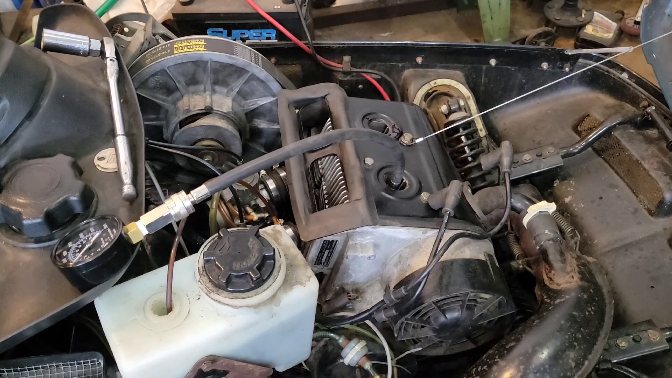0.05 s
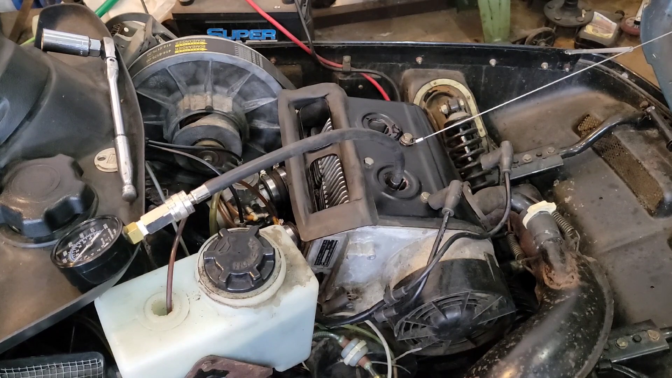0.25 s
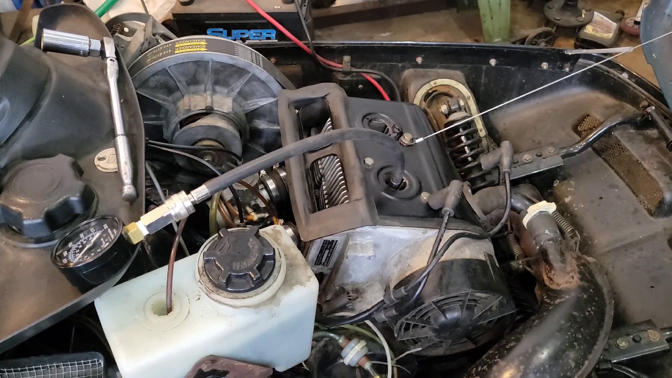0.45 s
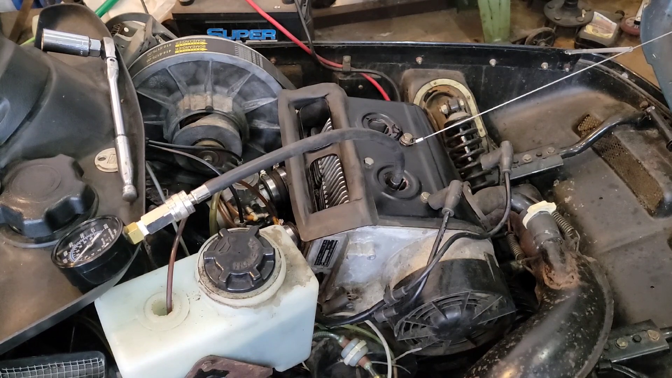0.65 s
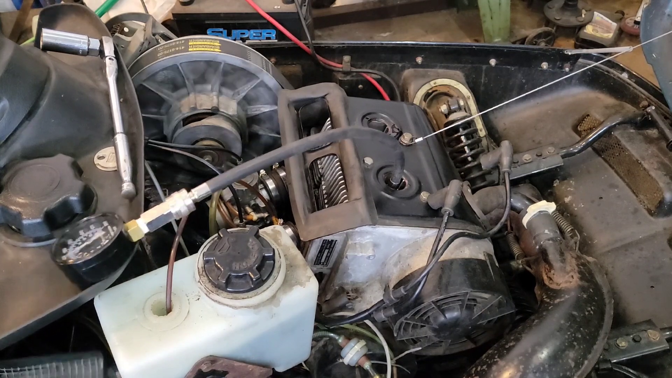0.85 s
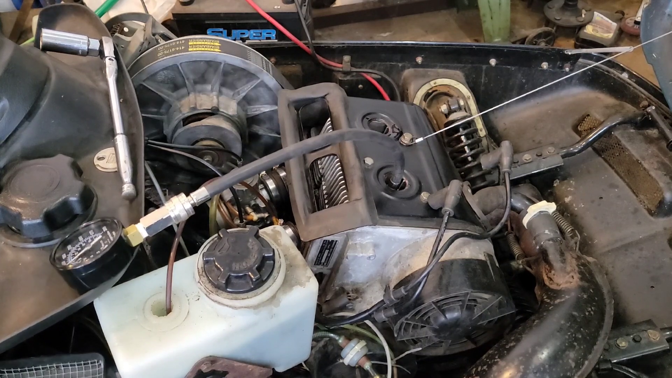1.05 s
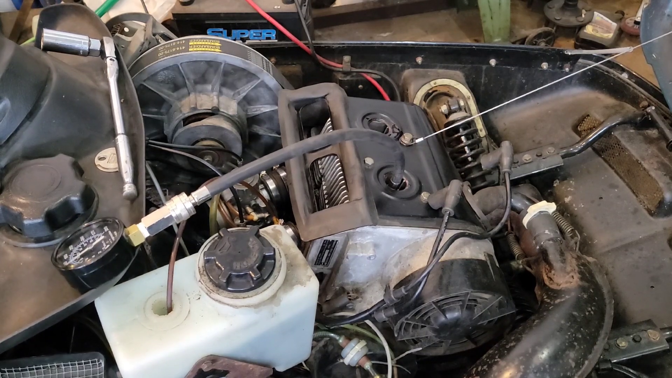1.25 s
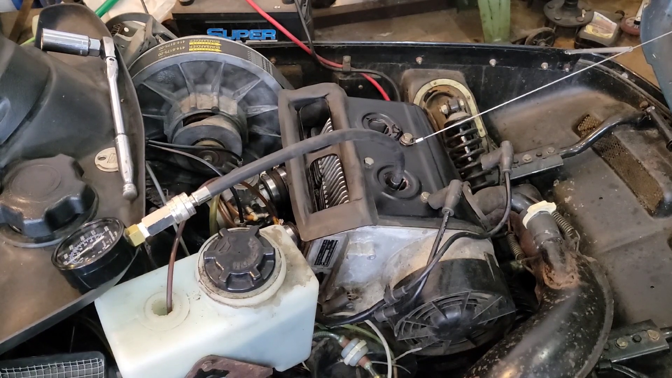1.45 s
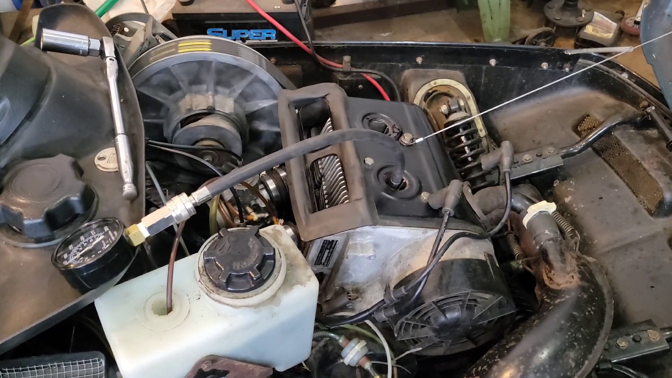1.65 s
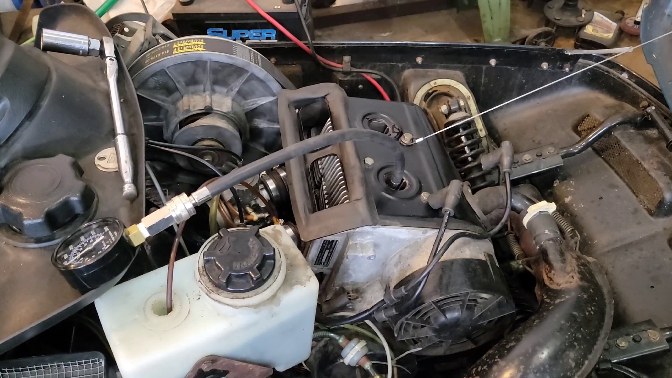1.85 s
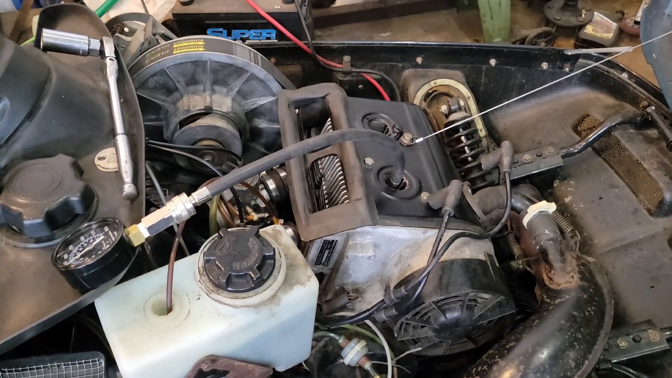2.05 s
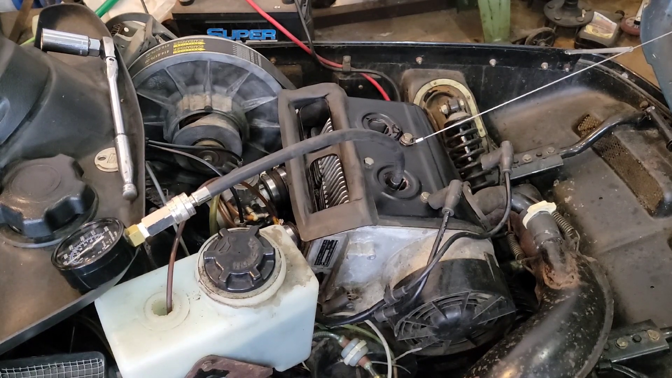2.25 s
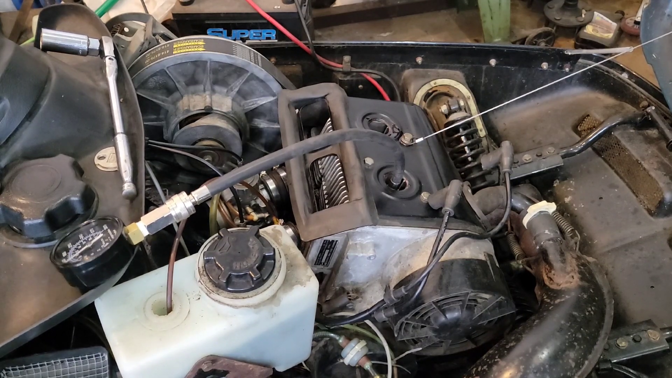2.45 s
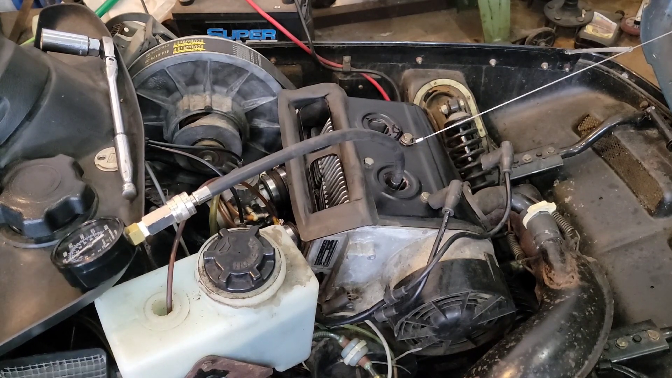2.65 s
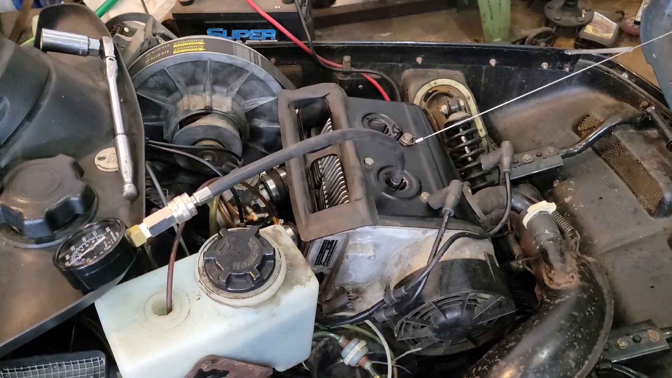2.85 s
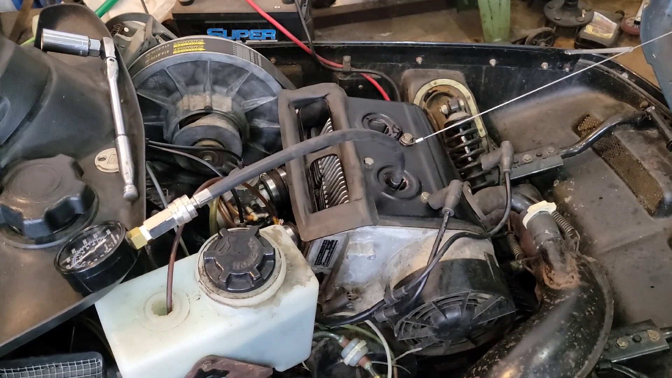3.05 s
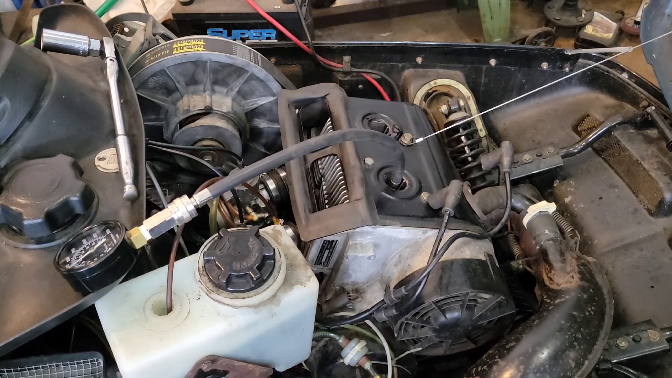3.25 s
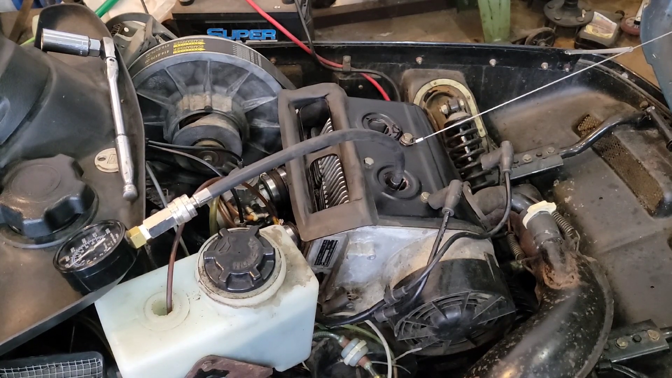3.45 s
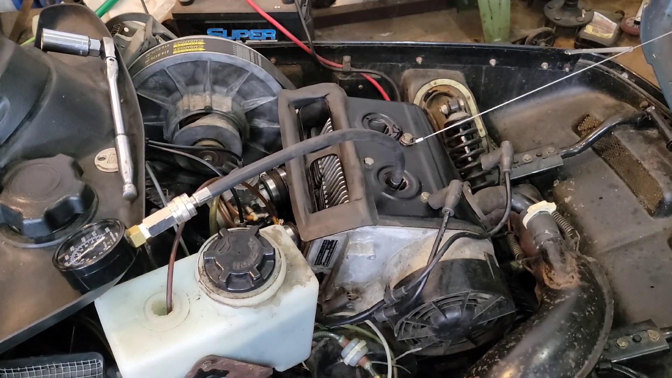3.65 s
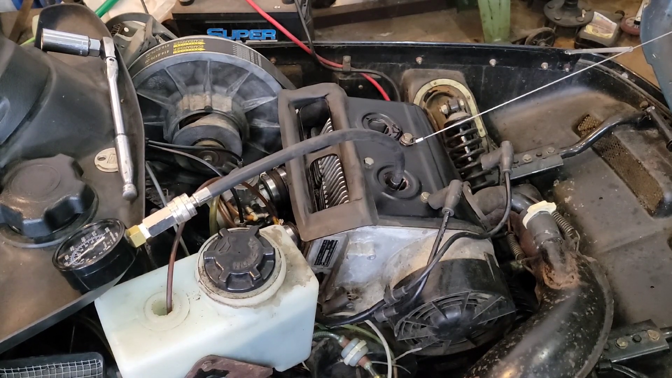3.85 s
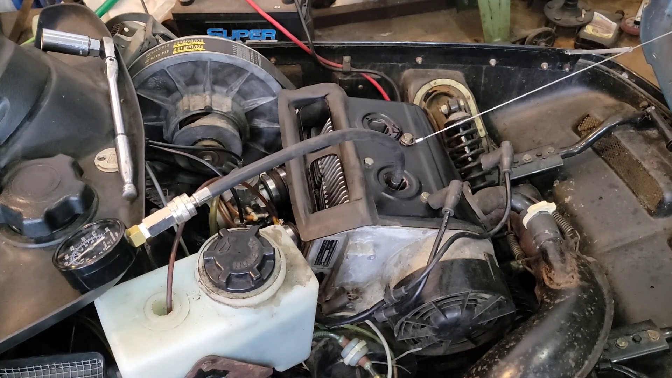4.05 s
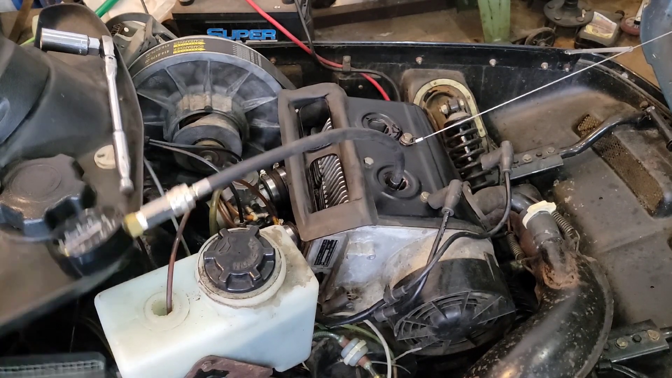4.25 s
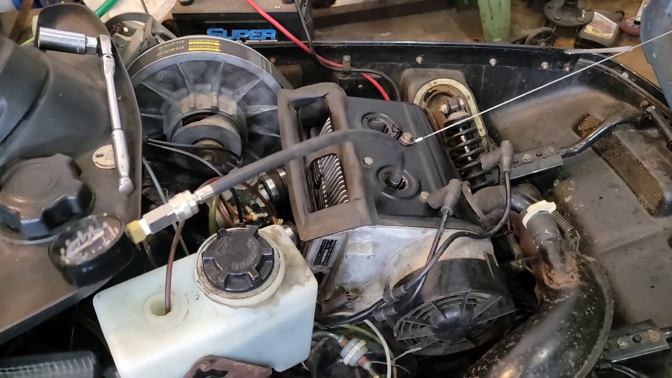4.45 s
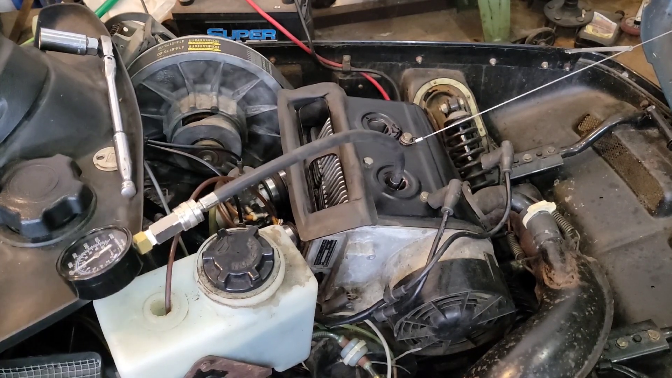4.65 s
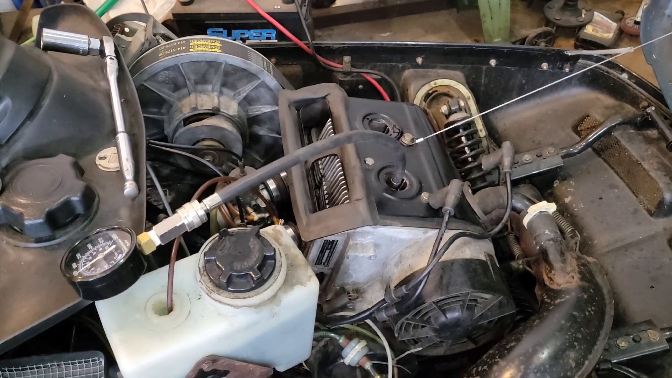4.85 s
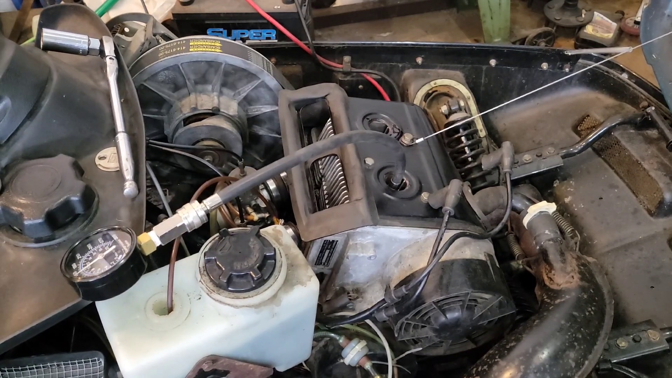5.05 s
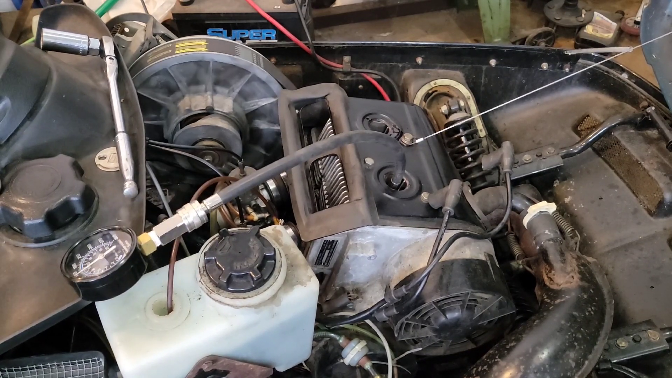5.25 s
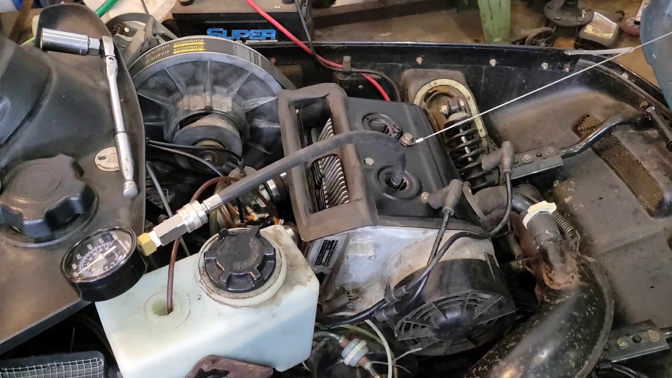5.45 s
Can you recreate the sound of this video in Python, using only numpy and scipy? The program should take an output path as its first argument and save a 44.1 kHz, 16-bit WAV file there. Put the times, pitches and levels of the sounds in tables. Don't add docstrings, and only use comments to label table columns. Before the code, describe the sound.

Two hard rope-start pulls spin a small engine in short puffing, clattering bursts that die without catching, separated by quiet rewinding scrapes and knocks.

```python
import sys
import numpy as np
from scipy import signal
from scipy.fft import rfft, irfft
from scipy.io import wavfile

SR = 44100
rng = np.random.default_rng(int(sys.argv[2]) if len(sys.argv) > 2 else 0)


def gain_from_db(level_db):
    decades = np.asarray(level_db, float) / 20
    return 10 ** decades


def digitize_waveform(pressure):
    field = np.atleast_2d(pressure).T
    bounded = np.clip(field, -1, 1)
    quanta = np.round(bounded * 32767).astype(np.int16)
    wavfile.write(sys.argv[1], SR, quanta)


N = 242991
EARS = np.array([[1], [-1]])


def rms_one(x):
    return x / np.sqrt(np.mean(x ** 2) + 1e-20)


def in_time(rows):
    s, *columns = np.transpose(rows)
    return [np.interp(np.arange(N) / SR, s, column) for column in columns]


def at_hz(points, hz):
    points_hz, values = np.array(points).T
    return np.interp(np.log(hz), np.log(points_hz), values)


def add(track, start_s, piece):
    i = round(start_s * SR)
    end = min(N, i + piece.shape[-1])
    track[..., i:end] += piece[..., :end - i]


def drift(rate_hz):
    r = np.exp(-80 * np.pi * rate_hz / SR)
    slow = signal.lfilter([1], [1, -2 * r, r * r], rng.standard_normal(N // 40 + 2002))[2000:]
    return np.interp(np.arange(N) / 40, np.arange(len(slow)), rms_one(slow))


def wobble(t, rough_db):
    steps_s = np.arange(0, t[-1] + .012, .012)
    flutter = np.array([np.interp(t, steps_s, rng.standard_normal(len(steps_s))) for ear in (0, 1)])
    return gain_from_db(rough_db * np.minimum(t / 0.095, 1) * flutter)


def resonate(x, hz, width_hz):
    r = np.exp(-np.pi * width_hz / SR)
    poles = [1, -2 * r * np.cos(2 * np.pi * hz / SR), r * r]
    return signal.lfilter([(1 - r * r) / 2, 0, (r * r - 1) / 2], poles, x)


def highpass(x, order, cut_hz):
    return signal.sosfilt(signal.butter(order, cut_hz, "high", fs=SR, output="sos"), x)


# (time [s], thump level [dB], thump pitch [Hz], bark level [dB])
EXHAUST_OPENINGS = [(0.9187, -7.5, 102.6, -4.5), (1.044, -5, 116.4, -5), (1.1455, -4, 105, -5),
                    (1.256, -8, 119, -6.5), (1.3923, -6.5, 101, -8), (1.599, -15, 80.6, -15.5),
                    (1.75, -21, 98.6, -56), (4.467, -7.5, 96.6, -4.5), (4.589, -6, 121, -3.5),
                    (4.691, -2.5, 109, -9), (4.803, -13, 101, -20), (4.944, -12, 102, -8),
                    (5.04, -15, 81.5, -11.5), (5.303, -26.5, 90, -22)]
BARK_HZ, BARK_HZ_PER_DB = 473, 6.5


def exhaust_pops():
    out, t = np.zeros(N), np.arange(-.03, .12, 1 / SR)
    for s, thump_db, thump_hz, bark_db in EXHAUST_OPENINGS:
        bark_hz = BARK_HZ + BARK_HZ_PER_DB * thump_db
        thump_shape = np.where(t < 0, np.exp(-(t / 0.0061) ** 2), np.exp(-t / 0.017))
        bark_shape = np.where(t < 0, np.exp(-(t / 0.0016) ** 2), np.exp(-t / 0.0036))
        thump = gain_from_db(thump_db) * thump_shape * np.cos(2 * np.pi * thump_hz * t)
        bark = gain_from_db(bark_db) * bark_shape * np.cos(2 * np.pi * bark_hz * t)
        add(out, s + t[0], -thump - bark)
    return out


# (first crest time [s], level [dB], start pitch [Hz], open time [s])
INTAKE_OPENINGS = [(.986, -7.5, 123, 0.033), (1.079, -12.5, 91, 0.02), (1.109, -11.5, 98, 0.022),
                   (1.197, -10.5, 123, 0.043), (1.314, -11, 112.4, 0.038), (1.482, -15, 92.5, 0.038),
                   (1.787, -24, 100, 0.012), (4.5313, -7.5, 109, 0.03), (4.628, -11.5, 95, 0.012),
                   (4.656, -9.5, 92.5, 0.036), (4.693, -21, 114, 0.058), (4.742, -12, 113, 0.032),
                   (4.7983, -6.5, 100, 0.003), (4.865, -21.5, 103, 0.044), (5.0715, -21, 102, 0.025)]
CRANKCASE_REST_HZ = 80.6


def intake_gulps():
    out, t = np.zeros(N), np.arange(-.02, .12, 1 / SR)
    for s, level_db, start_hz, open_s in INTAKE_OPENINGS:
        slide = (CRANKCASE_REST_HZ - start_hz) * t * np.abs(t) / (2 * open_s)
        phase = 2 * np.pi * (start_hz * t + slide)
        swell = (np.minimum(t, 0) / 0.0051) ** 2
        closing = (np.maximum(t - open_s, 0) / 0.0053) ** 2
        ring = np.cos(phase) + .2 * np.cos(2 * phase + 0.21)
        add(out, s + t[0], gain_from_db(level_db) * np.exp(-swell - closing) * ring)
    return out


def port_slaps(level_db, t60_s):
    out, t = np.zeros(N), np.arange(0, .1, 1 / SR)
    for s, port_db, *_ in INTAKE_OPENINGS + EXHAUST_OPENINGS:
        slap = gain_from_db(port_db + level_db - 60 * t / t60_s) * (1 - np.exp(-t / 0.027))
        add(out, s - .012, slap)
    return out


# (time [s], chassis shake [dB], pulley and fan effort [dB])
PULLS = [
    [(.76, -53, -48.5), (.83, -51, -39), (.95, -24.5, -23.5), (1.03, -19, -23.5), (1.27, -22, -27),
     (1.55, -33.5, -33.5), (1.7, -42, -39), (1.87, -47, -47.5), (2.16, -90, -86)],
    [(4.34, -57, -46.5), (4.5, -25.5, -28), (4.58, -19, -23), (4.74, -25, -29), (5.03, -18, -28),
     (5.14, -25, -32), (5.25, -36.5, -36.5), (5.39, -43, -40), (5.51, -66, -46.5)],
]
# (time [s], level [dB])
ROPE_SLIDE = [(0, -58), (.7, -62), (1.3, -32), (1.55, -35.5), (1.84, -33.5), (2.12, -40.5), (2.33, -41),
              (2.55, -51.5), (2.68, -35), (2.87, -48), (3.08, -43), (3.22, -52.5), (3.64, -50.5),
              (3.99, -69), (4.4, -65.5), (5.28, -44), (5.38, -34.5), (5.51, -43)]
PULL_DB = [1.5, -1.5, -3.5, 2.5, -9.5, -18]
ROPE_DB = [-16, -16.5, -7, -10.5, -10.5, -30]
PULL_FOLLOWS = [0.95, 0.9, 0.99, 1.026, 1.13, 0.94]
ROPE_FOLLOWS = [0.68, 0.81, 1.21, 0.48, 0.36, 0.27]
FULL_DB, SLIDING_DB, BOOM_TOP_DB = -25, -55, -29


def rattle_levels():
    drives = []
    for rows in PULLS:
        before, after = (rows[0][0] - .01, -120, -120), (rows[-1][0] + .1, -120, -120)
        drives.append(in_time([before] + rows + [after]))
    shake_db, effort_db = np.max(drives, axis=0)
    rope_db, = in_time(ROPE_SLIDE)
    pulled_db, slid_db = [], []
    for drive_db, db, steep in zip([shake_db] * 2 + [effort_db] * 4, PULL_DB, PULL_FOLLOWS):
        pulled_db.append(FULL_DB + db + steep * (drive_db - FULL_DB))
    for db, steep in zip(ROPE_DB, ROPE_FOLLOWS):
        slid_db.append(SLIDING_DB + db + steep * (rope_db - SLIDING_DB))
    pulled_db[0] = np.minimum(pulled_db[0], BOOM_TOP_DB)
    return gain_from_db(np.array(pulled_db)) + gain_from_db(np.array(slid_db))


# (frequency [Hz], correlation [-1..1])
LIKENESS = [(60, 1), (130, 0.93), (290, 0.83), (640, 0.041), (1410, -0.34), (3100, -0.051), (6820, -0.14),
            (15000, -0.05)]
# (frequency [Hz], source number [-])
ZONES = [(140, 0), (210, 1), (420, 1), (520, 2), (940, 2), (1080, 3), (1900, 3), (3400, 4), (6600, 4),
         (7400, 5)]


def stereo_zones(spectrum, patchy_db, grit_db):
    edges_hz = 30 * 2 ** (np.arange(28) / 3)
    contact = gain_from_db(grit_db * drift(110))
    white = rng.standard_normal((2, 2, N)) * contact
    zones = np.zeros((6, 2, N))
    for k, (low_hz, high_hz) in enumerate(zip(edges_hz, edges_hz[1:])):
        band_filter = signal.butter(2, [low_hz, high_hz], "band", fs=SR, output="sos")
        mid, side = signal.sosfilt(band_filter, white[k % 2])
        hz = np.sqrt(low_hz * high_hz)
        alike = np.clip(at_hz(LIKENESS, hz), -1, 1)
        gain = gain_from_db(at_hz(spectrum, hz) + patchy_db * drift(14.5))
        band = gain * (np.sqrt(1 + alike) * mid + np.sqrt(1 - alike) * side * EARS)
        place = at_hz(ZONES, hz)
        zones[int(place)] += (1 - place % 1) * band
        zones[int(np.ceil(place))] += place % 1 * band
    return zones


# (frequency [Hz], width [Hz], level [dB])
HOUSING = [(190, 25, -7), (318, 20, -3), (397, 16, -4), (530, 35, -5), (732, 30, 0), (850, 45, -4),
           (634, 40, -3), (993, 35, -7), (1267, 35, -5), (2060, 50, -9), (2980, 90, -10)]


def housing(x):
    out = .5 * x
    for hz, width_hz, level_db in HOUSING:
        out = out + gain_from_db(level_db + 3.4 * drift(14.0)) * resonate(x, hz, width_hz)
    return rms_one(out)


# (frequency [Hz], density [dB per Hz])
COLOUR = [(18, -45), (50, -4), (106, -5.5), (233, -12), (384, -11.5), (666, -23), (721, -17), (1350, -20.5),
          (1860, -19.5), (2170, -24), (3060, -21), (6050, -27.5), (8520, -45), (13700, -48.5), (16000, -53)]


def clatter(low_hz, high_hz, per_s, spread_db, t60_s):
    sizes = gain_from_db(spread_db * np.minimum(rng.exponential(1, (2, N)), 2))
    clicks = sizes * (rng.random((2, N)) < per_s / SR)
    dealt, out = rng.integers(0, 10, (2, N)), 0
    r = gain_from_db(-60 / (t60_s * SR))
    for k, hz in enumerate(np.geomspace(low_hz, high_hz, 10) * rng.uniform(0.94, 1.04, 10)):
        w = 2 * np.pi * hz / SR
        struck = clicks * (dealt == k) + 1e-18
        rung = signal.lfilter([0, np.sin(w)], [1, -2 * r * np.cos(w), r * r], struck)
        out = out + gain_from_db(at_hz(COLOUR, hz)) * np.sqrt(hz) * rung
    return rms_one(out)


TICKS = [(.7726, -18.5, -1.5, -12.5, 0.059), (.8994, -17.5, 5, 6.5, 0.14), (1.1109, -30.5, -21, 4.5, 0.04),
         (1.4879, -31.5, 6, 12, 0.025), (1.6174, -43, 12, 11.5, 0.16), (1.8585, -49.5, -5, 7.5, 0.28),
         (2.0364, -30.5, -8, 9, 0.036), (5.099, -38, -20, 9.5, 0.03), (5.238, -40, -20, 14, 0.03),
         (5.253, -38.5, -20, 10, 0.065), (2.232, -45.5, -20, 8, 0.059), (2.5557, -47, -10, 6, 0.03),
         (2.6145, -51, -10, 4, 0.03), (2.7625, -47, -10, 8, 0.033), (2.8789, -44, -9.5, 7, 0.041),
         (4.359, -41.5, -8, 6, 0.04), (2.8474, -45, -18, 11, 0.024), (4.436, -23.5, -4, 10, 0.18),
         (4.448, -23.5, 1, 5.5, 0.14), (4.8019, -25, -39, 18.5, 0.086), (4.8478, -10, 0.5, -1.8, 0.33),
         (5.0412, -17.5, -1, 0, 0.071), (5.14, -8, -4.5, -9.5, 0.1)]
KNOCKS = [(4.0834, -69.5, 17.5, -16.5, 0.094), (.838, -21, 6.5, 1.5, 0.3), (1.049, -16.5, 15, -30.5, 0.067),
          (2.118, -51.5, 2, 10, 0.18), (2.566, -36.5, 1, 8, 0.12), (2.577, -38, 1, 2, 0.13),
          (2.7444, -34.5, -5, -2.5, 0.2), (2.7904, -42, -4, 14, 0.064), (3.3254, -74, 12, -13, 0.19),
          (4.3066, -37, 5, 2.5, 0.3), (4.3705, -24, 0.5, -7.5, 0.61), (4.396, -22.5, 5, -4, 0.5),
          (4.516, -20.5, 11.5, -13, 0.12)]
THUDS = [(.0235, -44.5, -2, -14, 0.081), (.056, -49, 6.5, 0, 0.16), (.2467, -49, -14, -12, 0.34),
         (1.3188, -9, -17, -5, 0.049), (1.345, -18.5, -29, 5.5, 0.11), (1.716, -25.5, -14, -7.5, 0.23),
         (2.4923, -38.5, -18, 13.5, 0.022), (2.4945, -29.5, 6, -2.5, 0.44), (2.6798, -23.5, 3, -9.5, 0.15),
         (2.9445, -24.5, -2.5, -16, 0.12), (3.1574, -57, -34, -10, 0.061),
         (3.4657, -41.5, -11.5, -12, 0.13), (3.5693, -46, -25, -6, 0.13), (3.6197, -35, -10.5, -8, 0.14),
         (4.7744, -37, -21, 18.5, 0.1), (5.2516, -27, -20, 5.5, 0.15)]
SCUFFS = [(.678, -55.5, 10, 7, 0.19), (2.020, -26, -10, 3, .15), (2.227, -21.5, -2, 3, 0.06),
          (2.873, -37, -25, 4.5, 0.2), (4.278, -41, 9.5, -5, 0.31), (4.708, -4, -3, -1, 0.029),
          (.764, -32.5, 3, 12, 0.1)]
TICK_HISS_DB, KNOCK_HISS_DB, THUD_HISS_DB = -1, -14.5, -17.5
SCUFF_RISE_S = .007


def knock_envelopes():
    out, t = np.zeros((4, 2, N)), np.arange(0, .5, 1 / SR)
    kinds = [(TICKS, TICK_HISS_DB, 0), (KNOCKS, KNOCK_HISS_DB, 0), (THUDS, THUD_HISS_DB, 0),
             (SCUFFS, KNOCK_HISS_DB, SCUFF_RISE_S)]
    part_lasts = np.array([1.13, 1.02, 0.65, 0.61])[:, None, None]
    part_snap = np.array([0.049, 0.28, 0.91, 0.15])[:, None, None]
    snap = part_snap * np.exp(-t / 0.0027)
    for rows, hiss_db, rise_s in kinds:
        for s, peak_db, dull_db, bright_db, t60_s in rows:
            parts_db = np.array([dull_db, 0, bright_db, bright_db + hiss_db])
            levels = gain_from_db(peak_db - 10.5 + parts_db)[:, None, None]
            lasts_s = max(t60_s, .01) * part_lasts
            crack_and_tail = gain_from_db(-60 * t / lasts_s) + 0.41 * gain_from_db(-60 * t / (5.13 * lasts_s))
            sides = gain_from_db(EARS * rng.normal(0, 1.2))
            rise = 1 - np.exp(-t / (0.0068 * t60_s + rise_s))
            if rise_s:
                rise = rise ** 2
            add(out, s, levels * sides * (crack_and_tail + snap) * rise)
    return out


def rattle():
    boom, panel, cowl, scrape, jingle, hiss = stereo_zones(COLOUR, patchy_db=2.0, grit_db=1.0)
    scrape = housing(scrape) + .55 * clatter(1100, 2500, per_s=250, spread_db=4.0, t60_s=.04)
    jingle = housing(jingle) + .6 * clatter(2500, 6800, per_s=900, spread_db=4.0, t60_s=.045)
    noises = [rms_one(boom), housing(panel), housing(cowl), rms_one(scrape), rms_one(jingle), rms_one(hiss)]
    dull, middle, bright, top = knock_envelopes()
    panel_knocks = 0.34 * dull + port_slaps(level_db=-7.5, t60_s=0.073)
    knocks = [.07 * dull, panel_knocks, dull, middle, bright, top]
    return sum(noise * (level + knock) for noise, level, knock in zip(noises, rattle_levels(), knocks))


# (time [s], level [dB])
BRACKET_BLOWS = [(1.321, -21), (1.345, -22.5), (1.376, -29)]
PAWL_BLOWS = [(4.775, -27.5), (4.802, -19.5)]
GUIDE_BLOWS = [(2.033, -34), (2.039, -21), (2.240, -37)]
# (frequency [Hz], level [dB], t60 [s])
BRACKET_MODES = [(1690, -4, .15), (2000, 0.5, .08), (2150, -4.5, .08), (2540, -3.5, 0.2), (2740, 3, .07),
                 (3020, 1.5, .08), (3280, -1, 0.03), (3380, -10.5, 0.14), (4486, -9.5, .25),
                 (4600, -9.5, .2), (5700, -9.5, 0.18)]
PAWL_MODES = [(1812, 6, .25), (1935, 6, .22), (2070, -4, .15), (2350, -3, .25), (3700, -1, .17),
              (4755, 0, .09), (6100, -14, .06), (4540, -12, .05), (6912, -12, .2)]
GUIDE_MODES = [(839, -6.5, 0.14), (1446, -9, 0.043), (1840, -8, 0.08), (2900, 5.5, 0.036),
               (3030, -16, 0.25), (3100, -16, 0.27), (3140, -4, 0.042), (4040, -10, 0.025),
               (4620, -19, .05)]
RISE_CYCLES = 6.0


def struck_metal():
    out, t = np.zeros((2, N)), np.arange(0, .6, 1 / SR)
    parts = [(BRACKET_BLOWS, BRACKET_MODES), (PAWL_BLOWS, PAWL_MODES), (GUIDE_BLOWS, GUIDE_MODES)]
    strikes = [(blow, mode) for blows, modes in parts for blow in blows for mode in modes]
    for (s, blow_db), (hz, level_db, t60_s) in strikes:
        start = rng.uniform(0, 2 * np.pi) + rng.uniform(0.3, 0.52) * EARS
        first = 1 + hz / 4000 * np.exp(-t / 0.004)
        rise = 1 - np.exp(-t * hz / RISE_CYCLES)
        fade = gain_from_db(blow_db + level_db - 60 * t / t60_s) * first * rise
        add(out, s, fade * wobble(t, rough_db=3.0) * np.sin(2 * np.pi * hz * t + start))
    return out


PINGS = [(0.028, 356, -50.5, 0.62), (3.622, 4580, -43, 0.063), (3.621, 1260, -47, 0.074),
         (3.621, 822, -44, 0.094), (3.622, 608, -48.5, 0.29), (.248, 1230, -50, .1),
         (.520, 531, -53.5, 0.16), (.778, 840, -25, 0.11), (0.899, 3720, -16, 0.06),
         (0.978, 2680, -19.5, 0.09), (1.05, 732, -8.5, 0.13), (.056, 2850, -56, .08),
         (.066, 3050, -56, .05), (.066, 700, -49, .12), (.682, 2950, -60, .05), (.248, 2900, -59, .04),
         (3.466, 2500, -54, .04), (3.57, 1300, -56, .05), (2.682, 748, -25, 0.24),
         (2.848, 13000, -44, 0.046), (2.946, 623, -33, 0.091), (2.97, 107, -49, 0.47),
         (3.464, 2860, -52, .08), (3.623, 2170, -38, 0.04), (3.624, 353.6, -48, 0.35),
         (4.087, 270, -57.5, 0.08), (3.326, 647, -46.5, 0.065), (0.901, 5800, -27, 0.3),
         (2.4925, 3900, -27, 0.035), (2.4925, 5300, -29, 0.02), (2.497, 820, -27, 0.12),
                (2.565, 4400, -35, 0.04), (2.581, 3860, -31, 0.06), (2.764, 830, -30, 0.05),
                (2.803, 800, -32, 0.2),
         (4.311, 513, -34.5, 0.093), (4.332, 95, -36, 0.11), (4.449, 3780, -41, 0.28),
              (4.516, 696, -10.5, 0.065), (4.856, 292, -7.5, 0.045), (4.893, 424, -9.5, 0.089),
              (4.924, 310, -9, 0.056), (4.714, 3620, -17, 0.047), (5.045, 1750, -19, 0.039),
              (5.145, 6450, -19, 0.021)]
# (time [s], pitch [Hz], level [dB], t60 [s])
MORE_PINGS = [(.85, 928, -19.5, 0.11), (.94, 840, -26.5, 0.064), (0.972, 1100, -19, .07),
              (1.005, 1490, -25.5, 0.087), (1.035, 560, -16.5, .06), (1.062, 924, -18, .06),
              (1.09, 628, -24, 0.058), (1.108, 2110, -19, .05), (1.122, 800, -25.5, 0.064),
              (1.149, 1157, -17, .06), (1.27, 780, -28.5, .07), (1.322, 5700, -24, .08),
              (1.321, 3020, -18.5, .08), (1.322, 2000, -23.5, .07), (1.332, 1414, -22, .07),
              (1.346, 3060, -15, .07), (1.347, 4530, -29.5, .15), (1.392, 1160, -20, 0.052),
              (1.482, 736, -23, 0.1), (1.602, 1030, -24, 0.11), (1.632, 752, -25, 0.058),
              (1.721, 1002, -26, 0.1), (1.752, 875, -32, 0.1),
              (4.371, 744, -22, 0.12), (4.405, 720, -20.5, 0.14), (4.42, 1456, -19.5, 0.12),
                   (4.435, 820, -16.5, 0.065), (4.445, 2060, -19, 0.053), (4.455, 1077, -15.5, 0.13),
                   (4.512, 2380, -32, 0.046), (4.55, 520, -29, 0.062), (4.552, 730, -26, 0.063),
                   (4.565, 1640, -16, 0.066), (4.61, 1240, -18.5, 0.089), (4.635, 316, -19, 0.17),
                   (4.523, 322, -14, .05), (4.795, 424, -12.5, 0.055), (4.655, 2650, -21, 0.064),
                   (4.712, 1278, -20, 0.2), (4.732, 710, -17, 0.065), (4.853, 790, -14, .05),
                   (4.866, 520, -13, 0.062), (4.905, 630, -14.5, 0.066), (4.975, 343, -17, .1),
                   (5.03, 186, -15, 0.085), (5.06, 403, -15, 0.053), (5.14, 2425, -22, 0.072),
                   (5.141, 1890, -17, 0.066), (5.148, 903, -17, 0.067), (5.155, 369, -18, 0.14),
                   (5.18, 1008, -20.5, 0.13)]


def pings():
    out, t = np.zeros((2, N)), np.arange(0, .5, 1 / SR)
    for s, hz, level_db, t60_s in PINGS + MORE_PINGS:
        start = rng.uniform(.4, 1, (2, 1, 1)) * EARS * min(hz / 1200, .9)
        main = np.sin(2 * np.pi * hz * t + start[0])
        partner = .5 * np.sin(2 * np.pi * 1.045 * hz * t + start[1])
        fade = gain_from_db(level_db - 60 * t / t60_s) * (1 - np.exp(-t / 0.00068))
        add(out, s, fade * wobble(t, rough_db=4.5) * (main + partner))
    return out


# (time [s], length [s], pitch [Hz], width [Hz], level [dB])
WHIRRS = [(0.284, 0.3, 1680, 240, -61), (2.037, 0.19, 2900, 320, -41), (3.324, 0.21, 734, 54, -52),
          (3.33, 0.19, 510, 49, -53.5), (3.677, 0.3, 1702, 170, -62), (3.696, 0.26, 590, 76, -59.5),
          (3.78, 0.083, 179.5, 17, -58.5), (4.85, .2, 259, 330, -25.5), (.842, .045, 13050, 900, -38),
          (1.495, .06, 13100, 800, -46), (2.101, .36, 800, 220, -47), (3.353, 0.17, 2020, 140, -58),
          (3.497, 0.16, 1710, 120, -60), (3.847, .14, 1550, 93, -66), (3.701, .1, 3000, 120, -64)]


def whirrs():
    out = np.zeros((2, N))
    for s, length_s, hz, width_hz, level_db in WHIRRS:
        part = np.linspace(0, 1, int(length_s * SR))
        note = rng.standard_normal((2, SR // 2))
        for stage in (0, 1):
            note = resonate(note, hz, width_hz)
        swell = np.minimum(13.0 * part, 1) * (1 - part) ** 0.73
        add(out, s, gain_from_db(level_db) * swell * rms_one(note)[:, -len(part):])
    return out


ROOM_T60_S, WALL_CUT_HZ, ROOM_DB = .35, 2300, -16
ROOM_BASS_HZ = 75


def room(source):
    x = highpass(source, 2, ROOM_BASS_HZ)
    out, dull = np.zeros((2, N)), np.exp(-2 * np.pi * WALL_CUT_HZ / SR)
    for k, lag in enumerate((rng.uniform(0.022, .05, 12) * SR).astype(int)):
        loop, gain, state = x.copy(), gain_from_db(-60 * lag / SR / ROOM_T60_S), [0.]
        for i in range(lag, N, lag):
            back, state = signal.lfilter([gain * (1 - dull)], [1, -dull], loop[i - lag:i], zi=state)
            loop[i:i + lag] += back[:N - i]
        out[k % 2] += (loop - x) * (-1) ** (k // 2)
    return gain_from_db(ROOM_DB) * out


# (frequency [Hz], density [dB per Hz])
GARAGE = [(18, -62), (60, -21.5), (215, -11.5), (252, -11), (437, -5.5), (721, -14.5), (988, -24),
          (3060, -35), (8500, -63.5), (13000, -46)]
GARAGE_DB = -67


def garage():
    hz = np.arange(N // 2 + 1) * SR / N + 1
    mid, side = irfft(rfft(rng.standard_normal((2, N))) * gain_from_db(at_hz(GARAGE, hz)), N)
    return gain_from_db(GARAGE_DB) * rms_one(mid + 0.57 * side * EARS)


def scene():
    breathing = exhaust_pops() + intake_gulps()
    clanks = struck_metal() + pings() + whirrs()
    echoes = room(breathing + clanks.mean(axis=0))
    return breathing + rattle() + clanks + echoes + garage()


TOP_FROM_HZ, TOP_TO_HZ, RUMBLE_CUT_HZ = 7300, 15500, 40


def patchy_top(x, lost, edge_db):
    hz, s, parts = signal.stft(x, SR, nperseg=1024)
    hz = hz[:, None]
    near_edge = np.exp(-((hz - TOP_FROM_HZ - 1100) / 2000) ** 2)
    fuller = np.exp(-((hz - 13300) / 1200) ** 2)
    chance = rng.random((len(hz) // 8 + 1, len(s) // 4 + 1))
    chance = np.repeat(np.repeat(chance, 8, axis=0), 4, axis=1)[:len(hz), :len(s)]
    kept = chance > lost + .25 * near_edge - .25 * fuller
    gain = np.where(hz < TOP_FROM_HZ, 1, kept * gain_from_db(edge_db * near_edge)) * (hz < TOP_TO_HZ)
    return signal.istft(parts * gain, SR, nperseg=1024)[1][:, :N]


def low_pass(x):
    return signal.sosfilt(signal.butter(12, 16460, fs=SR, output="sos"), x)


def record(dry):
    cut = highpass(dry, 3, RUMBLE_CUT_HZ)
    held = 1.1 * np.tanh(cut / 1.1)
    mix = patchy_top(held, lost=0.23, edge_db=-5.5)
    return low_pass(mix)


dry = scene()
out = record(dry)
digitize_waveform(out)
```